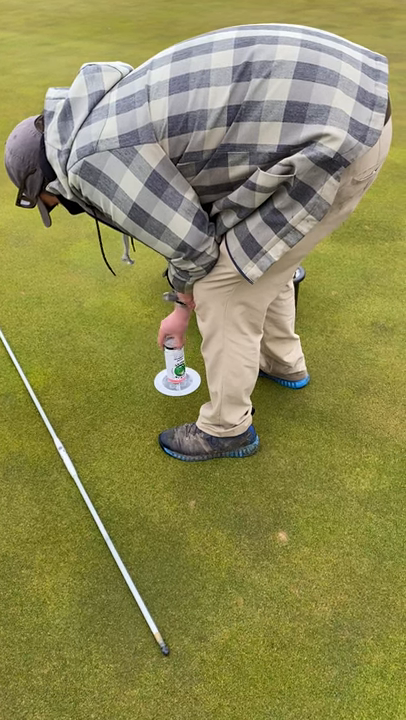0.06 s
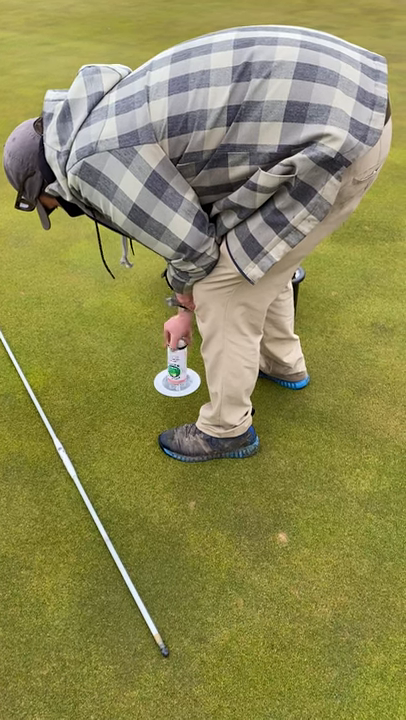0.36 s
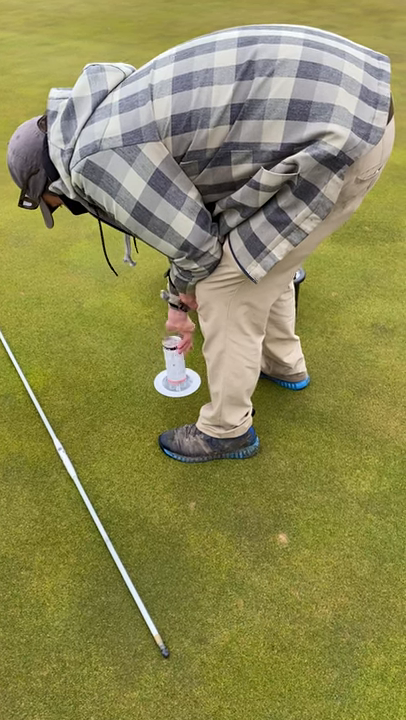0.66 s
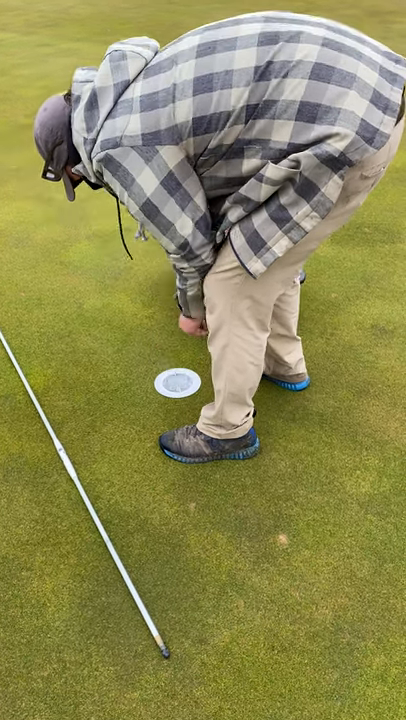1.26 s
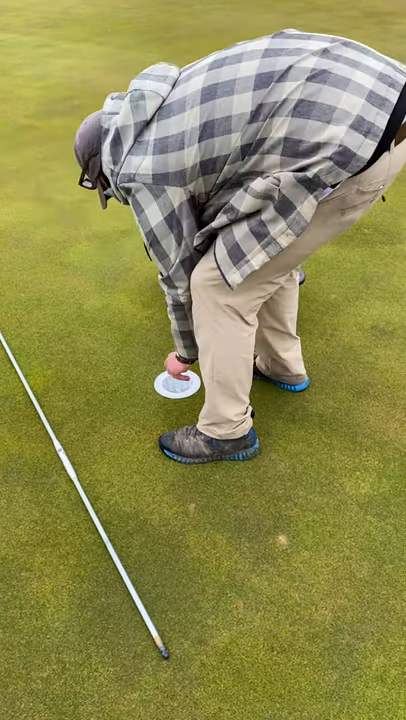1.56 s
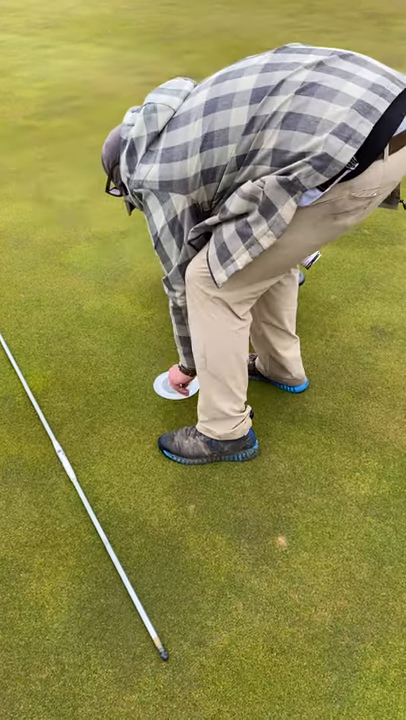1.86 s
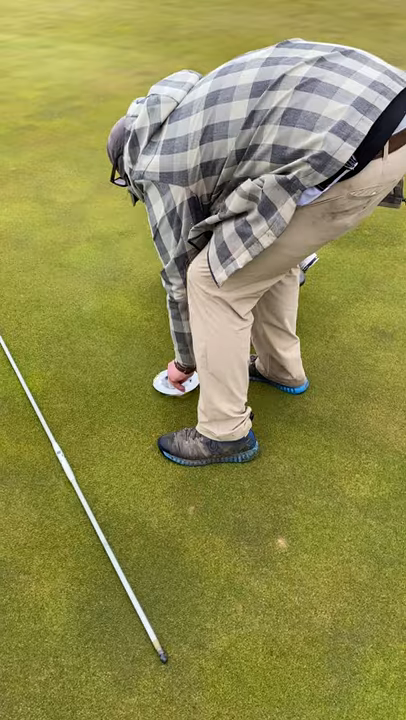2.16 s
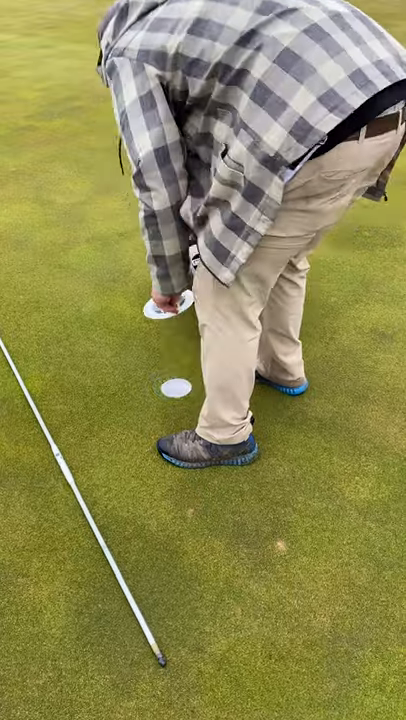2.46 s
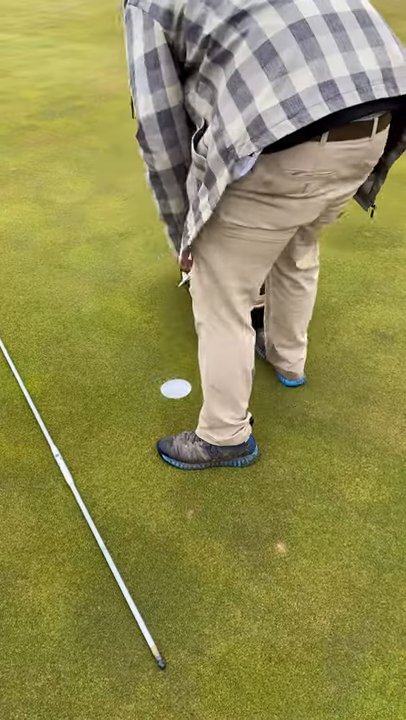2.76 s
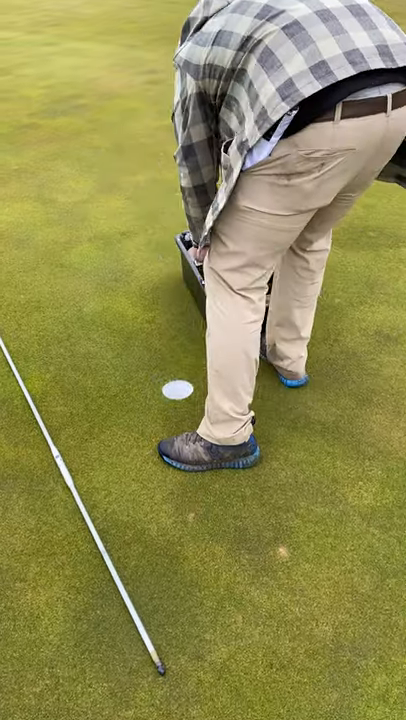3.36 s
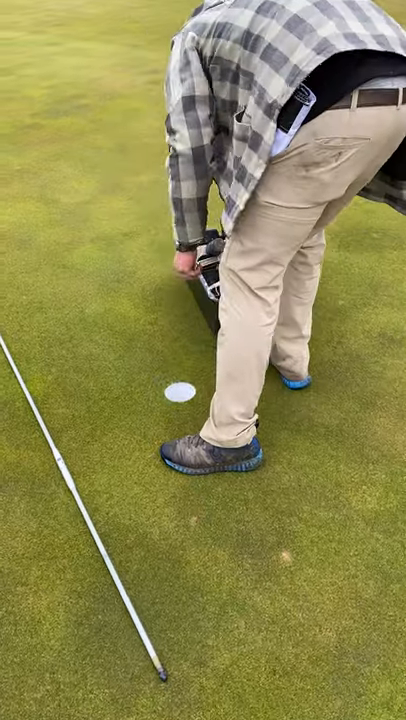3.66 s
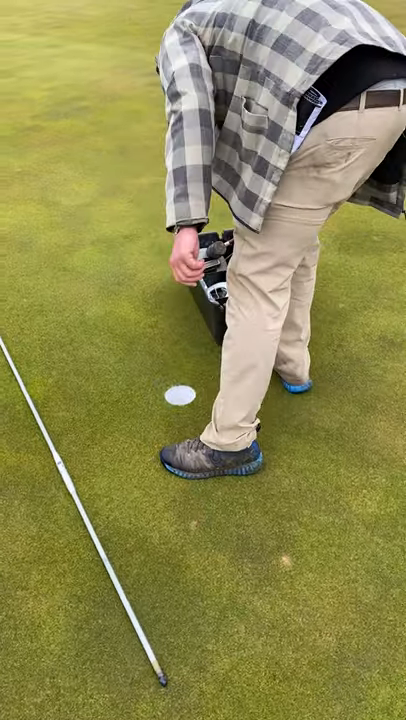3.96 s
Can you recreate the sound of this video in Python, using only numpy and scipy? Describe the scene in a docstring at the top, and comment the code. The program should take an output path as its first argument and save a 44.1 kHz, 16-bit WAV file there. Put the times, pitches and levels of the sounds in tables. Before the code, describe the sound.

A metal tool squeals and scrapes twice in a golf hole's plastic ring, with a brief spray hiss. A jacket rustles and distant birds whistle, then gear clatters loudly into a plastic case, heard nearby in open air.

```python
"""A squeal over open air and a low, distant drone: a can-shaped metal tool sticks and slips in the plastic
guide ring of a golf hole. It is twisted twice, with gritty scraping, chirps, a hiss of spray and ticks.
Small birds whistle far off and a jacket rustles. The gear drops into a plastic case: the walls boom,
hard contacts clack, the loose load rattles and metal rings. A phone with two close ports listens."""
import sys
import numpy as np
from scipy import signal
from scipy.fft import rfft, irfft
from scipy.io import wavfile
from scipy.ndimage import uniform_filter1d, map_coordinates

SR = 44100
rng = np.random.default_rng(int(sys.argv[2]) if len(sys.argv) > 2 else 0)


def transcribe(u):
    """Save the signal u as a 16-bit wav file named by the first command-line argument.

    u: samples, shape (n,) or (channels, n), limited to [-1, 1]; the rate is SR.
    q: integer samples, one column per channel.
    """
    v = np.clip(np.atleast_2d(u).T, -1, 1)
    q = np.round(v * 32767).astype(np.int16)
    wavfile.write(sys.argv[1], SR, q)


N = 176400

# spectrum of the spray can's hiss, also colouring the scrape's grit: f/Hz, level/dB
HISS_EQ = [(900, -2.5), (2500, -8.5), (4400, -12.5), (5500, 3), (6800, -11), (7850, 13), (8400, -24),
           (9500, -35), (12000, 6), (14500, 0), (16000, -11)]


def amp(db):
    """Decibels to gain."""
    return 10 ** (np.asarray(db) / 20)


def unit(x):
    """Scale to rms 1."""
    return x / np.sqrt(np.mean(x ** 2))


def clock(size=N):
    """Time of every sample in seconds."""
    return np.arange(size) / SR


def fader(points):
    """Gain along (t/s, level/dB) points, silent outside."""
    return amp(np.interp(clock(), *np.array(points).T, left=-150, right=-150))


def along_hz(hz, values, size):
    """Values joined on a log-frequency axis, for each bin of a sound of this size."""
    return np.interp(np.log(np.arange(size // 2 + 1) * SR / size + 1), np.log(hz), values)


def eq(x, points):
    """Filter by (f/Hz, level/dB) points."""
    return irfft(rfft(x) * amp(along_hz(*np.array(points).T, len(x))), len(x))


def resonate(x, hz, width):
    """One resonance, gain 1 at its centre."""
    return signal.lfilter(*signal.iirpeak(hz, hz / width, fs=SR), x)


def wander(rate_hz):
    """Smooth random modulation of rms 1."""
    hold = int(SR / rate_hz)
    steps = np.repeat(rng.standard_normal(N // hold + 1), hold)[:N]
    return unit(uniform_filter1d(steps, hold))


def grains(spread):
    """Noise of many tiny slips of uneven size."""
    return unit(rng.standard_normal(N) * np.exp(spread * (wander(900) + .5 * wander(90))))


def strike(modes):
    """Half a second of struck modes (f/Hz, level/dB, t60/s), alternating in polarity."""
    t = clock(SR // 2)
    return sum((-1) ** (k + 1) * amp(db) * np.sin(2 * np.pi * hz * t) * np.exp(-np.log(1000) * t / t60)
               for k, (hz, db, t60) in enumerate(modes))


def add(out, start, x):
    """Mix x in at a time in seconds."""
    i = min(max(int(start * SR), 0), N)
    out[i:i + len(x)] += x[:N - i]


def glide(length, hz_from, hz_to, db):
    """A tone that swells, slides in an S-curve and fades."""
    progress = np.linspace(0, 1, int(length * SR))
    hz = hz_from + (hz_to - hz_from) * np.sin(np.pi * progress / 2) ** 2
    return amp(db) * np.sin(np.pi * progress) * np.sin(2 * np.pi * np.cumsum(hz) / SR)


def smear(x, decay_s, size):
    """Convolve with a decaying noise tail of unit energy."""
    tail = rng.standard_normal(size) * np.exp(-clock(size) / decay_s)
    return signal.fftconvolve(x, tail / np.linalg.norm(tail))[:N]


def ports(x, unrelated=None):
    """Two close microphone ports differ in phase and level; wide sources add an unrelated part."""
    # stereo image: f/Hz, left lead/rad, left minus right/dB, unrelated share 0-1
    image = [(100, 0, .2, .002), (160, -.1, 1.5, .06), (280, -.4, 2.5, .2), (450, -1, 0, .55),
             (700, -.55, -5, .6), (1300, 0, -5.5, .45), (2200, 0, -3.8, .55), (3100, .4, -5.5, .75),
             (4300, 1.9, -3, .7), (6000, 1.8, 0, .25), (7500, 2.5, 0, .12), (9000, 3.05, 0, .01),
             (10500, 3.2, 0, .005), (12000, 3.45, 0, .2), (14500, 4.55, 0, .35)]
    hz, *columns = np.array(image).T
    lead, balance, share = (along_hz(hz, column, N) for column in columns)
    sides, spectrum = np.array([[1], [-1]]), rfft(x)
    if unrelated is not None:
        spectrum = spectrum * np.sqrt(1 - share / 2) + sides * rfft(unrelated) * np.sqrt(share / 2)
        balance = balance * .24  # diffuse sound sits nearer the centre
    return irfft(spectrum * amp(sides * balance / 2) * np.exp(.5j * sides * lead), N)


def air():
    """A wide bed of open air and a low, wavering drone far away."""
    # spectrum of the open air: f/Hz, level/dB
    air_eq = [(20, -29.5), (33, -17), (50, 0), (80, 3.5), (100, -5), (125, 1.5), (160, -12), (250, -18),
              (450, -24), (900, -20.5), (1400, -25.5), (2500, -35.5), (4500, -41), (6500, -53),
              (9000, -59.5), (16000, -62)]
    # swell of the drone: t/s, level/dB
    drone_level = [(0, -47.5), (1, -60), (2, -47.5), (3, -49.5), (4, -49)]
    air_db, drone_hz, width_hz = -50, 80.26, 11.3
    bed = ports(*(unit(eq(rng.standard_normal(N), air_eq)) for _ in range(2)))
    drone = resonate(rng.standard_normal(N), drone_hz, width_hz)
    drone = unit(resonate(drone, drone_hz, 2 * width_hz))
    return amp(air_db + .72 * wander(3.07)) * bed + fader(drone_level) * drone


def squeal():
    """Stick-slip locks on the tool's lowest mode, then breaks into a buzz at a third of that rate."""
    # swell of the first twist: t/s, level/dB
    swell = [(.055, -88), (.068, -50.5), (.12, -44), (.17, -40), (.22, -41), (.275, -45.5), (.32, -51.5),
             (.38, -76)]
    # squeal overtones: multiple of the pitch, clean level/dB, chattering level/dB
    overtones = [(2, -1, -19), (3, -6, -24), (4.025, 1.5, -18), (5, -12, -27), (5.55, -14, -20),
                 (6, -5, -20)]
    # chatter partials: multiple of the slip rate, level/dB
    partials = [(2, -24), (4, -17), (5, -12), (6, -13), (7, -15), (8, -11), (9, -16), (10, -16), (11, -19),
                (12, -14), (13, -9), (14, -11), (15, -19), (16, -19), (17, -10), (18, -12)]
    pitch_hz, break_s, crossfade_s = 1327, .148, .017
    chatter_end_s, release_s, flicker_db = .283, .012, 3
    t = clock()
    cycles = np.cumsum(pitch_hz * (1 + .0025 * wander(300))) / SR
    rough = np.clip((t - break_s) / crossfade_s + .5, 0, 1)
    tone = np.cos(2 * np.pi * cycles)
    for k, clean_db, rough_db in overtones:
        tone += amp(clean_db + rough * (rough_db - clean_db)) * np.cos(2 * np.pi * k * cycles)
    slips = np.cumsum(pitch_hz / 3 * (1 + .008 * wander(400))) / SR
    chatter = sum(amp(db + flicker_db * wander(250)) * np.cos(2 * np.pi * (k * slips + rng.random()))
                  for k, db in partials)
    release = np.exp(-np.maximum(t - chatter_end_s, 0) / release_s)
    return np.sqrt(2) * (tone + rough * release * chatter) * fader(swell)


def scrape():
    """Grit rubs the tool's resonances; its thin wall adds many close, short ones."""
    # scraping pressure: t/s, level/dB
    pressure = [(.055, -70), (.075, -51), (.11, -47), (.155, -43.5), (.19, -43), (.27, -51), (.315, -74),
                (.38, -65), (.40, -55), (.435, -57), (.47, -59), (.492, -51.5), (.525, -54), (.57, -56),
                (.576, -42), (.596, -44), (.62, -63), (.645, -66), (.655, -52.5), (.675, -56), (.695, -73),
                (.735, -90), (.743, -58.5), (.775, -85)]
    # resonances of the tool: f/Hz, width/Hz, level/dB
    tool_modes = [(1390, 35, 0), (2170, 70, -2), (2435, 40, 5), (2640, 35, 5), (2880, 120, 0),
                  (3590, 100, 3), (4000, 150, -7), (5340, 60, 3), (5750, 420, 1), (6200, 120, -6),
                  (7380, 70, 2), (7720, 120, -2)]
    grit_db, wall_db, low_cut_hz = -7.5, -2, 1000
    grit = grains(spread=.4)
    body = sum(amp(db) * resonate(grit, hz, width) for hz, width, db in tool_modes)
    rub = unit(body) + amp(grit_db) * unit(eq(grit, HISS_EQ))
    rub = unit(rub + amp(wall_db) * smear(rub, decay_s=.0028, size=SR // 16))
    return signal.lfilter(*signal.butter(2, low_cut_hz, "high", fs=SR), rub) * fader(pressure)


def hiss():
    """The spray can hisses evenly through the second twist, combed by a shifting reflection."""
    start_s, end_s, release_s, level_db = .35, .586, .0087, -48.5
    t = clock()
    gate = (t > start_s) * np.exp(-np.maximum(t - end_s, 0) / release_s)
    jet = eq(rng.standard_normal(N), HISS_EQ)
    delay_s = .000594 + .00031 * (t - start_s)
    reflection = map_coordinates(jet, [(t - delay_s) * SR], mode="mirror")
    return amp(level_db) * gate * unit(jet + .35 * reflection)


def touches():
    """Small dry ticks as tool and ring are lifted."""
    # light contacts: t/s, level/dB, decay/s, centre f/Hz
    ticks = [(.397, -54, 0.004, 2480), (0.431, -49.5, 0.0068, 1950), (0.742, -53, 0.012, 870),
             (1.066, -61, 0.0023, 4970), (1.332, -46, 0.0061, 1690), (1.49, -52, 0.0095, 1860),
             (1.602, -44.5, 0.0055, 2940), (1.617, -42, 0.0084, 630)]
    out, t = np.zeros(N), clock(SR // 4)
    for start, db, decay, hz in ticks:
        band = resonate(rng.standard_normal(len(t)), hz, width=hz)
        band = unit(resonate(band, hz, width=2 * hz))
        add(out, start, amp(db) * np.exp(-t / decay) * band)
    return out


def squeaks():
    """Stick-slip gives short rising chirps in the second twist."""
    # chirps of the tool: t/s, length/s, start f/Hz, end f/Hz, level/dB
    chirps = [(.42, 0.14, 1205, 1246, -53), (0.487, 0.029, 1315, 1410, -43),
              (0.511, 0.063, 1338, 1408, -43.5)]
    out = np.zeros(N)
    for start, *note in chirps:
        add(out, start, glide(*note))
    return out


def birds():
    """Slurred whistles and runs of faint twitter, fluttering and smeared by distance."""
    # bird notes: t/s, length/s, start f/Hz, end f/Hz, level/dB
    whistles = [(1.016, 0.052, 3690, 3800, -66), (1.059, 0.064, 3970, 4110, -65.5),
                (1.612, 0.043, 4070, 4300, -61), (1.736, 0.06, 4100, 3230, -57),
                (1.867, 0.065, 3740, 3180, -59), (1.996, 0.04, 4400, 3930, -64),
                (2.055, 0.13, 3780, 3830, -80), (2.098, 0.039, 3350, 3050, -65.5),
                (2.132, 0.044, 2505, 3610, -60.5), (2.238, 0.078, 3810, 2460, -61.5),
                (2.24, 0.16, 3784, 3826, -70), (2.402, 0.079, 2280, 3360, -60.5),
                (2.51, 0.063, 3400, 2900, -66), (2.804, 0.044, 3290, 2830, -73),
                (2.857, 0.04, 2670, 3240, -65), (2.958, 0.077, 2600, 3300, -66),
                (3.138, 0.06, 3310, 2770, -66)]
    # runs of twitter: start t/s, end t/s, centre f/Hz, level/dB
    twitter = [(1.87, 2.62, 4700, -72), (2.53, 3.35, 3050, -62)]
    note_s, spacing_s, sweep = .012, .08, .12
    flutter_db, direct_db, echo_db = 3, -4, -4
    out = np.zeros(N)
    for start, *note in whistles:
        add(out, start, glide(*note))
    for start, end, hz, db in twitter:
        for at in np.arange(start, end, spacing_s):
            late, high, loud = rng.standard_normal(size=3)
            centre = hz * (1 + .02 * high)
            chip = glide(note_s, centre * (1 + sweep), centre * (1 - sweep), db + loud)
            add(out, at + late * note_s / 2, chip)
    out *= amp(flutter_db * wander(200))
    echo = np.array([smear(out, decay_s=.035, size=SR // 2) for _ in range(2)])
    return amp(direct_db) * out + amp(echo_db) * echo


def jacket():
    """Cloth slides as the arm reaches down and the body straightens."""
    # movement of the sleeve and of the jacket's body: t/s, level/dB
    sleeve_move = [(1.05, -79), (1.2, -60), (1.3, -54.5), (1.44, -51), (1.62, -53), (1.76, -54.5),
                   (1.86, -67), (1.95, -72)]
    body_move = [(2.3, -76), (2.5, -62.5), (2.61, -66), (2.72, -53), (2.85, -57), (2.95, -64), (3.1, -66.5),
                 (3.22, -60.5), (3.33, -64.5), (3.42, -68), (3.8, -59.5), (4, -68.5)]
    # spectrum of each rustle: f/Hz, level/dB
    sleeve_eq = [(150, 16.5), (300, 6.5), (700, 7), (1500, 8), (3000, 3.5), (6000, 1.5), (8000, -6.5),
                 (11000, -16), (15500, -8.5)]
    body_eq = [(150, -5.5), (300, 9), (500, -1.5), (1000, -5.5), (2500, -9.5), (4300, -10.5), (6000, -11),
               (10000, -23.5), (12000, -27), (15500, -20)]
    out = np.zeros((2, N))
    for move, tone in ((sleeve_move, sleeve_eq), (body_move, body_eq)):
        out += ports(*(unit(eq(grains(spread=.2), tone)) * fader(move) for _ in range(2)))
    return out


def clacks():
    """Hard contacts crack, ring the case's short modes and set small loose parts jangling."""
    # gear hitting the case: t/s, body level/dB, crack level/dB, tilt/dB per octave, pitch factor
    hits = [(3.4648, -34, -29, 10, 1.72), (3.469, -23.5, -35, 2.5, 0.97), (3.497, -13.5, -18.5, 2, 1.007),
            (3.504, -28.5, -36, -12.5, 1.05), (3.516, -18, -28.5, -3, 1.01), (3.5202, -16, -24, 6, 0.93),
            (3.530, -48, -37.5, 0, 1), (3.596, -42.5, -52, 5, 1), (3.658, -32, -36, 7, 1.09),
            (3.665, -32, -45.5, -2, 1.08), (3.675, -29.5, -47, -13, 0.88), (3.6943, -38, -48, -2, 0.93),
            (3.70, -36, -64, 0.5, 1.3), (3.718, -30, -43, 3, 1.04), (3.722, -33, -39, -1.5, 1.1),
            (3.7412, -27, -42, 0, 1.026), (3.766, -35.5, -62, -2.5, 0.96), (3.775, -48, -65, 4, 0.89),
            (3.81, -50, -72, -1, 1.28), (3.861, -40, -70, -4, 0.99), (3.988, -30.5, -27.5, 0, 0.98)]
    # modes of the case and its load: f/Hz, level/dB, t60/s
    case_modes = [(390, -10.5, 0.022), (514, -10, 0.069), (573, -8.5, 0.05), (709.7, -11.5, 0.15),
                  (821, -9, 0.07), (908, -9, 0.033), (1186, -14, 0.043), (1305, -8.5, 0.049),
                  (1387, -12, 0.035), (1564, -17.5, 0.06), (2227, -14, 0.025), (2373, -23, 0.046),
                  (2730, -35, 0.024), (3110, -20.5, 0.051)]
    # spectrum of a contact: f/Hz, level/dB
    crack_eq = [(300, 11), (1000, 5), (3000, 0.5), (4600, -5), (5700, 3), (7500, -7.5), (10000, -2),
                (15000, -5), (17000, -36)]
    crack_s, rattle_s, rattle_db, rattle_top_hz = .003, .018, -12, 6000
    jangle_db, jangle_t60_s, detune, scatter_db = -26, .08, .012, 3.77
    out, t = np.zeros(N), clock(SR // 2)
    jangle = strike([(hz, jangle_db, jangle_t60_s) for hz in rng.uniform(5000, 15500, 24)])
    for start, body_db, crack_db, tilt, pitch in hits:
        modes = []
        for hz, db, t60 in case_modes:
            high, loud = rng.standard_normal(2)
            mode_db = db + body_db + tilt * np.log2(hz / 1000) + scatter_db * loud
            modes.append((hz * pitch * (1 + detune * high), mode_db, t60))
        noise = unit(eq(rng.standard_normal(len(t)), crack_eq))
        rattle = signal.lfilter(*signal.butter(1, rattle_top_hz, fs=SR), noise)
        crack = noise * np.exp(-t / crack_s) + amp(rattle_db) * rattle * np.exp(-t / rattle_s)
        add(out, start, strike(modes) + amp(crack_db) * (crack + jangle))
    return out


def knocks():
    """Gear lands in the case: the walls boom until the load settles on them."""
    # blows on the walls: t/s, f/Hz, level/dB, t60/s
    blows = [(3.4681, 261, -9, 0.096), (3.469, 440, -15.5, 0.085), (3.503, 327, -15.5, 0.039),
             (3.519, 259, -16, 0.076), (3.53, 310, -16.5, 0.078), (3.6, 320, -25, 0.15),
             (3.6651, 279.5, -16.5, 0.062), (3.666, 509, -18.5, 0.047), (3.70, 289, -27.5, 0.061),
             (3.724, 313, -19, 0.048), (3.751, 225, -42, 0.32), (3.862, 269, -36, 0.053),
             (3.988, 216.7, -28.5, 0.13)]
    # modes of a wall: frequency ratio, level/dB
    wall_modes = [(0.619, -15), (0.999, 1.5), (1.652, -24.5)]
    attack_s, settle_s = .0016, .034
    out, t = np.zeros(N), clock(SR // 2)
    envelope = (1 - np.exp(-t / attack_s)) * np.exp(-(t / settle_s) ** 4)
    for start, hz, db, t60 in blows:
        boom = strike([(hz * ratio, db + mode_db, t60) for ratio, mode_db in wall_modes])
        add(out, start, boom * envelope)
    return out


def loose_load():
    """Shaken by the blows, the loose load keeps rattling in tiny contacts all over the case."""
    # heavy blows: t/s, level/dB
    blows = [(3.468, -32.5), (3.498, -41), (3.521, -51), (3.597, -47.5), (3.661, -44), (3.72, -53),
             (3.741, -50.5), (3.80, -61.5)]
    # spectrum of the rattle: f/Hz, level/dB
    rattle_eq = [(200, -7), (450, 8.5), (1200, -3.5), (1800, -7), (2500, -1.5), (3200, -13.5), (4400, -9),
                 (6000, -17.5), (8000, -29), (15000, -30)]
    t, decay_s = clock(), .04
    shake = sum(amp(db) * (t > start) * np.exp(-np.maximum(t - start, 0) / decay_s)
                for start, db in blows)
    return ports(*(shake * unit(eq(grains(spread=.45), rattle_eq)) for _ in range(2)))


def metal():
    """Struck metal gear rings; a later blow chokes the first ringing, and the can sings as it settles."""
    # blows on the metal: t/s, level/dB, tilt/dB per octave
    blows = [(3.499, -41.5, -0.5), (3.522, -42, 12), (3.66, -54, 9), (3.723, -53, 14)]
    # modes of the metal gear: f/Hz, level/dB, t60/s
    gear_modes = [(1477, -1, .33), (2939, -14, .6), (3198, 1, .75), (3607, -3, .3), (4005, -3, .25),
                  (4307, -8, .33), (4730, -12, .3), (5475, -7, .27), (5749, 3, .2), (5884, 0, .22),
                  (7330, -7, .16), (7962, -8, .18), (12500, -12, .1), (14200, -12, .09)]
    choke_at_s, choke_decay_s, can_at_s = 3.66, .013, 3.765
    out, t = np.zeros(N), clock(SR // 2)
    for start, blow_db, tilt in blows:
        ring = strike([(hz, db + blow_db + tilt * np.log2(hz / 6000), t60) for hz, db, t60 in gear_modes])
        if start < choke_at_s:
            ring *= np.exp(-np.maximum(start + t - choke_at_s, 0) / choke_decay_s)
        add(out, start, ring)
    add(out, can_at_s, strike([(720, -46, .33), (1310, -53, .55)]))
    return ports(out)


def hollow_piece():
    """Last, a hollow piece is knocked against the case and rings with its own short modes."""
    # modes of the piece: f/Hz, level/dB, t60/s
    modes = [(498, -30.5, 0.065), (1165, -34, .05), (1300, -24, 0.049), (2050, -35.5, 0.08),
             (3180, -38, 0.047), (4410, -36, .05), (5400, -31.5, 0.031), (5550, -33.5, 0.036)]
    out = np.zeros(N)
    add(out, 3.9885, strike(modes))
    return out


def scene():
    """Tool and case as point sources, mixed with the other layers at the two ports."""
    tool = squeal() + scrape() + hiss() + touches() + squeaks()
    case = clacks() + knocks() + hollow_piece()
    return ports(tool + case) + loose_load() + metal() + jacket() + birds() + air()


def record(dry):
    """The phone cuts the top steeply above 16.2 kHz."""
    return signal.sosfilt(signal.ellip(8, .2, 70, 16200, fs=SR, output="sos"), dry)


dry = scene()
out = record(dry)
transcribe(out)
```